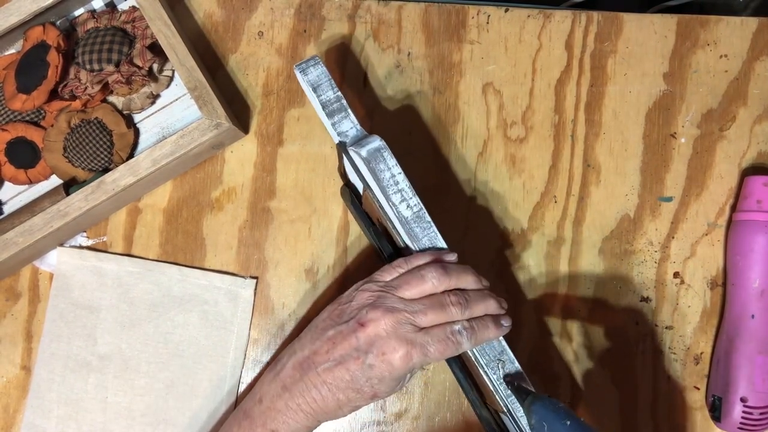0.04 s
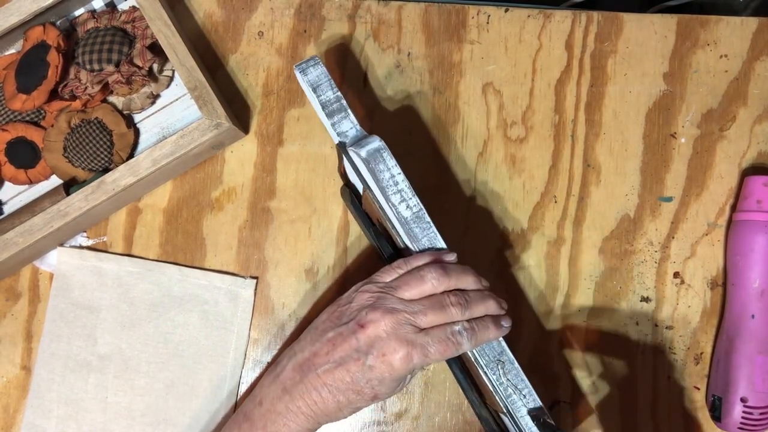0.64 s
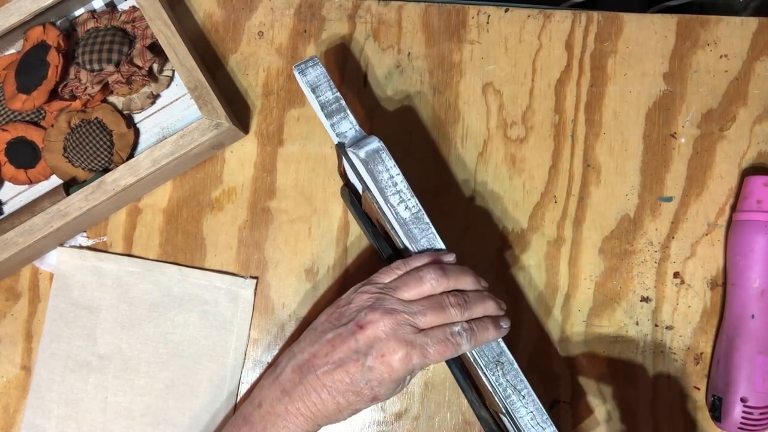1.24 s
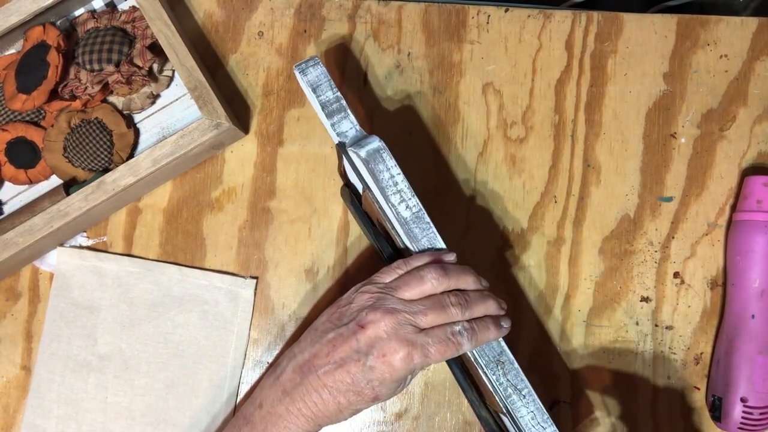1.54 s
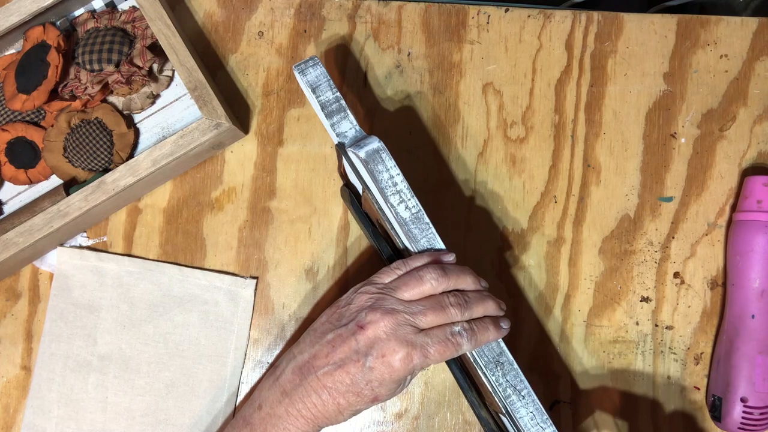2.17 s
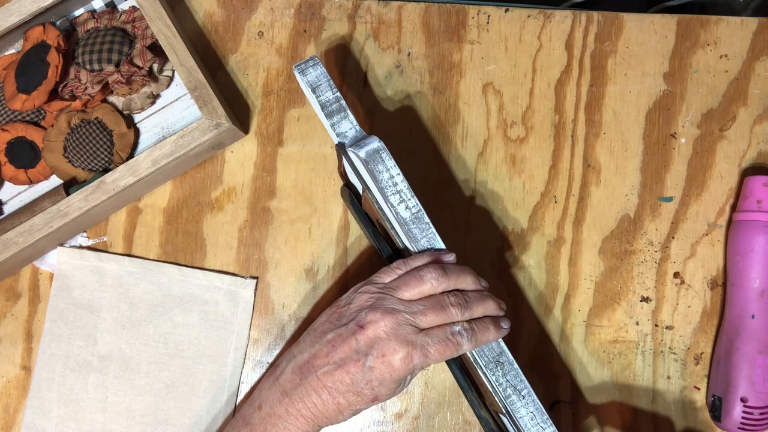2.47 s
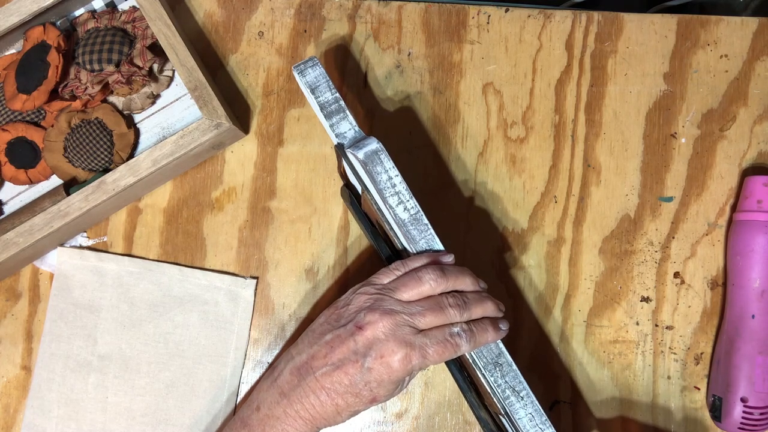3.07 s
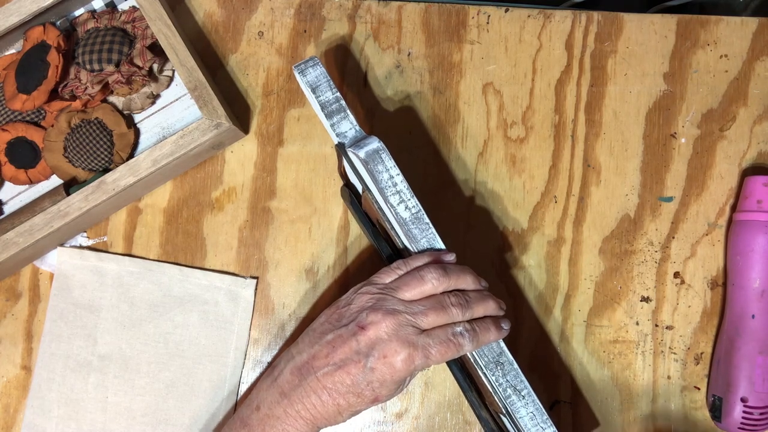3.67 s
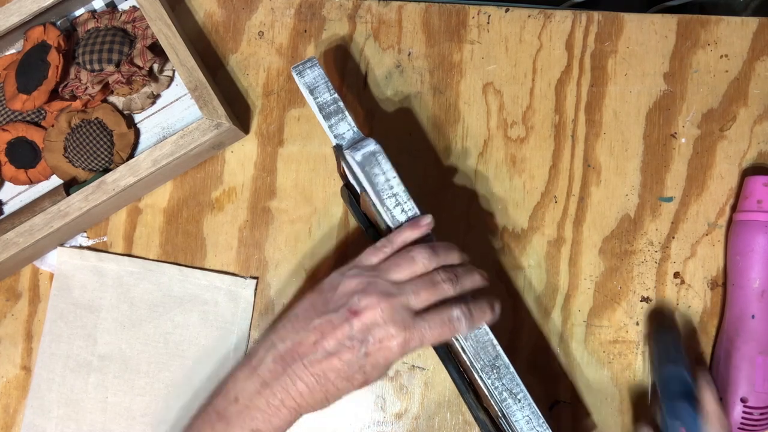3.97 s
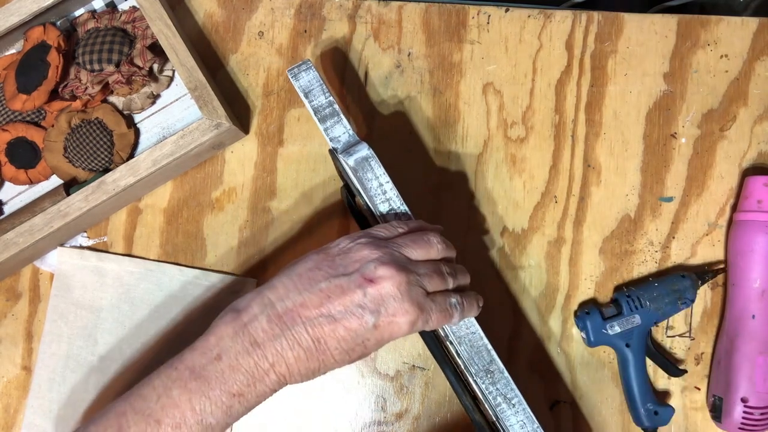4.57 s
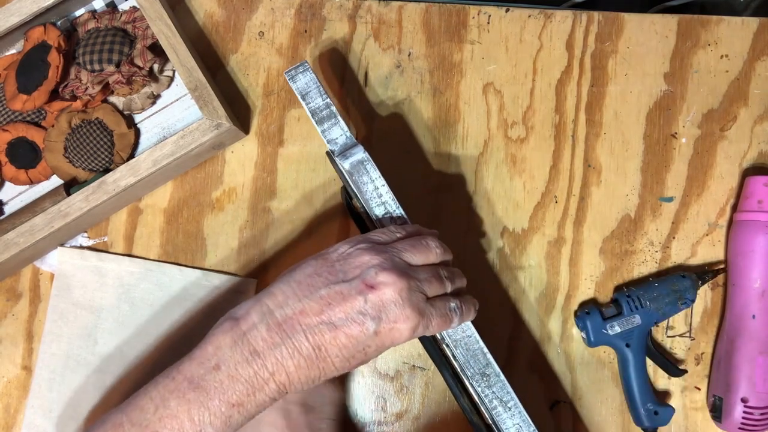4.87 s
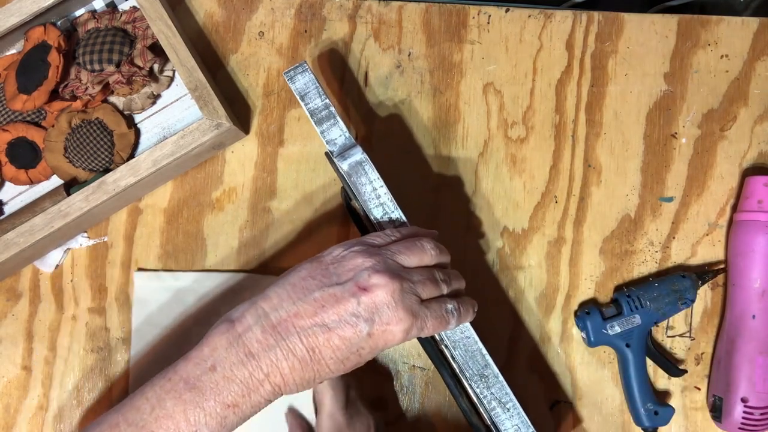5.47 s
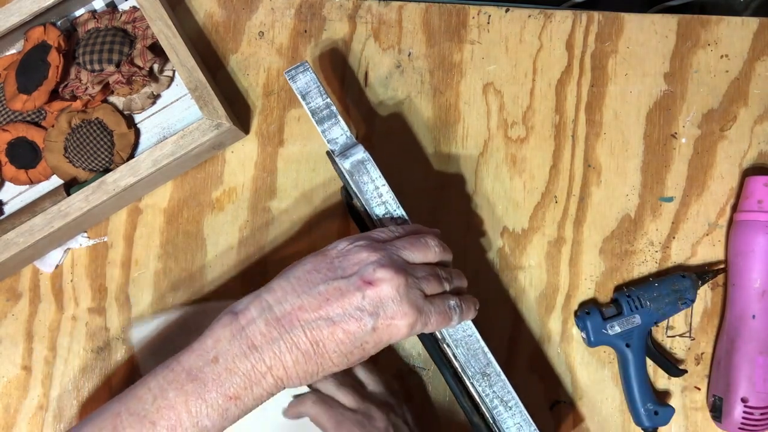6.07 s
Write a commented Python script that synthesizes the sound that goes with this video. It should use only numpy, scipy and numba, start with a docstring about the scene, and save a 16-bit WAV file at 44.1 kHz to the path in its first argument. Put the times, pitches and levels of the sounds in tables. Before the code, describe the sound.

In a small, quiet room, a hot-glue gun is squeezed four times, about once a second. Each squeeze gives a faint, dull rub and a light plastic click as the trigger snaps back. The gun is then put down on a plywood table, rattles and tips over with a sharp knock that briefly overloads the close microphone. A soft bump and a few light taps follow.

```python
"""A hot-glue gun is squeezed four times over a plywood work table: the glue stick feeds with a dull
stick-slip rub, then the plastic trigger scrapes and snaps back, ringing its housing. Put down, the gun
rattles and tips over with a sharp knock that rings shell and board and overloads the close microphone.
A hand then bumps the table and shifts the work. Behind it all is the air of a small, quiet room."""
import sys
import numpy as np
from scipy import signal
from scipy.fft import rfft, irfft, next_fast_len
from scipy.io import wavfile
from scipy.ndimage import uniform_filter1d
from numba import njit

SR = 44100
rng = np.random.default_rng(int(sys.argv[2]) if len(sys.argv) > 2 else 0)


def persist_wave(psi):
    """Save psi, clipped to +-1, as 16-bit WAV."""
    counts = np.round(np.clip(psi, -1, 1) * 32767).astype(np.int16)
    wavfile.write(sys.argv[1], SR, np.atleast_2d(counts).T)


N = 278712

# trigger let go after each squeeze: release t/s, stop t/s, release level/dB, release ring/dB,
# catch level/dB, stop level/dB, brightness/(dB/octave), slide level/dB, thud level/dB
TRIGGER_RELEASES = [(0.5378, 0.5864, -39.5, 3, -45, -37.5, -2.5, -54, -42.5),
                    (1.51, 1.5482, -33.5, 3, -30, -35, -1, -49, -41.5),
                    (2.53, 2.557, -35.5, 3, -31, -33, 1.5, -49.5, -35.5),
                    (3.4936, 3.5175, -43, 9, -52, -41.5, -5.5, -57.5, -30.5)]
def trigger(catch_lead_s=.0096, slide_growth_db=5.5):
    """The lever snaps free, slides back, catches on the ratchet and thuds against its stop."""
    out = np.zeros(N)
    for s, stop_s, snap_db, ring_db, catch_db, stop_db, tilt_db, slide_db, thud_db in TRIGGER_RELEASES:
        slide = scrape(stop_s - s + .012, slide_db, tilt_db=-1.4, ring_db=-9.5)
        swell = undb(slide_growth_db * np.linspace(-.5, .5, len(slide)))  # the spring speeds the lever up
        add(out, s, click(snap_db, tilt_db, ring_db))
        add(out, s + .005, slide * swell)
        add(out, stop_s - catch_lead_s, click(catch_db, tilt_db, ring_db=-2))
        add(out, stop_s, click(stop_db, tilt_db, ring_db=-2))
        add(out, stop_s + .005, thud(thud_db))
    return out


# tone of snapping plastic: f/Hz, level/dB
SNAP_EQ = [(300, -12), (1000, -2), (2800, 0.5), (3900, 2.5), (5200, -6.5), (7500, -5.5), (9500, -12.5),
           (15000, -21)]
# resonances of the trigger housing: f/Hz, level/dB, t60/s
HOUSING_MODES = [(1110, -7, 0.028), (1370, 2.5, 0.0075), (1650, -10, .03), (2394, -16.5, 0.07),
                 (3375, -12, 0.009), (4100, -11.5, 0.013)]
def click(db, tilt_db, ring_db):
    """Plastic snaps and the housing rings a moment later."""
    snap = undb(db - 3.5) * colour(crack(t60=.016, rise_s=.0015), SNAP_EQ, tilt_db)
    housing = np.pad(ring(HOUSING_MODES, detune=.018), (int(.0011 * SR), 0))[:len(snap)]
    return snap + undb(db + ring_db - 1) * housing


def scrape(length, db, tilt_db, ring_db, taper=.5):
    """A surface slides in tiny jerks with a hollow ring; it swells and stops."""
    count = int(length * SR)
    jerks = slips(count, per_s=9000, spread_db=2)
    housing = unit(signal.fftconvolve(jerks, ring(HOUSING_MODES, detune=.02))[:count])
    grit = colour(jerks, SNAP_EQ, tilt_db)
    return undb(db) * signal.windows.tukey(count, taper) * (grit + undb(ring_db) * housing)


# lone clicks: t/s, level/dB, brightness/(dB/octave), ring/dB
HOUSING_CLICKS = [(2.391, -59, -5, 9.5), (2.5246, -50.5, 6, 11), (3.7390, -47, 5.5, 2.5)]
def housing_clicks():
    """The housing clicks in the hand."""
    out = np.zeros(N)
    for s, db, tilt_db, ring_db in HOUSING_CLICKS:
        add(out, s, click(db, tilt_db, ring_db))
    return out


# ticks of the spring: t/s, level/dB, brightness/(dB/octave)
SPRING_TICKS = [(0.7353, -49, -5.5), (1.6228, -51, -1), (2.1810, -44.5, -3.5)]
# thin, bright tone of the spring: f/Hz, level/dB
SPRING_EQ = [(1400, -10), (3200, -15), (4300, 4), (5800, -11), (8000, -0.5), (12000, -11.5), (15000, -16)]
def spring_ticks():
    """The trigger spring ticks as it takes up load."""
    out = np.zeros(N)
    for s, db, tilt_db in SPRING_TICKS:
        add(out, s, undb(db) * colour(crack(t60=.016, rise_s=.00073), SPRING_EQ, tilt_db))
    return out


# pushes on the glue stick, and the gun dragging to rest: peak t/s, swell/s, level/dB
PUSHES = [(.41, 0.16, -55), (1.12, 0.035, -60), (1.24, 0.2, -55), (1.88, 0.18, -61), (2.39, 0.11, -56.5),
          (2.79, 0.065, -64), (3.489, 0.075, -55), (4.35, 0.079, -45.5)]
# dull tone of the rub: f/Hz, level/dB
RUB_EQ = [(60, -15), (115, -7), (185, 3.5), (290, -3.5), (480, -15.5), (1000, -23.5), (1750, -23),
          (2300, -32.5), (2900, -33.5), (3350, -21.5), (3750, -23.5), (4400, -32), (14000, -44.5)]
def glue_stick_rub(grip_db=-71, ease_share=.67):
    """Stick-slip rub follows the hand's force: each push swells and eases off over a resting grip."""
    t = np.arange(N) / SR
    power = undb(grip_db) ** 2
    for s, swell_s, db in PUSHES:
        from_peak = np.maximum((s - t) / swell_s, (t - s) / (ease_share * swell_s))
        power = power + (undb(db) / np.cosh(1.4 * from_peak)) ** 2
    return np.sqrt(power) * colour(slips(N, per_s=1100, spread_db=1), RUB_EQ)


# gun and hand hitting the table: t/s, contact corner f/Hz, board level/dB, shell level/dB, crack level/dB
KNOCKS = [(4.0369, 6500, -2.5, -11, -9.5), (4.0636, 610, -7.5, -27.5, -27),
          (4.0781, 4100, -20.5, -25.5, -22), (4.1085, 2800, -30, -30, -28), (4.1346, 1600, -23, -31, -34),
          (4.1745, 7016, -31, -25.5, -21), (4.1762, 450, -5, -27.5, -28.5),
          (4.1909, 554, -14.5, -26.5, -28.5), (4.2074, 9800, -0.5, 3, 1), (4.7940, 6500, -25, -58, -37)]
def knocks():
    """The gun lands, rocks and tips over; then the hand bumps the table."""
    out = np.zeros(N)
    for s, contact_hz, board_db, shell_db, crack_db in KNOCKS:
        add(out, s, blow(contact_hz, board_db, shell_db, crack_db))
    return out


# bursts of chatter: t/s, length/s, starting level/dB
RATTLES = [(4.073, .1, -25), (4.184, .01, -28.5), (4.224, .022, -23)]
def rattles(gap_s=.012, fall_db_per_s=100.5, scatter_db=1.5, contact_hz=2700):
    """After the gun lands and after it tips, loose parts chatter at uneven gaps and die away."""
    out = np.zeros(N)
    for s, length, db in RATTLES:
        for after in np.arange(0, length, gap_s):
            late, size = rng.standard_normal(2)
            part_db = db - fall_db_per_s * after + scatter_db * size
            hit = blow(contact_hz, board_db=part_db - .5, shell_db=part_db, crack_db=part_db - 3)
            add(out, s + after + .2 * gap_s * late, hit)
    return out


# resonances of the plywood table and the things on it: f/Hz, level/dB, t60/s
BOARD_MODES = [(167.5, -17.5, 0.16), (207.5, -16, 0.11), (341, -4, 0.055), (341, -20.5, 0.2),
               (411.5, -19.5, 0.2), (481, -13.5, .05), (603, -17, .04), (921.3, -9, .03), (1011, -14, 0.08),
               (1095, -13.5, .04), (1223, -11, 0.044), (1410, -20, .025), (3074, -24, .03),
               (4140, -17.5, 0.022)]
# resonances of the gun's shell: f/Hz, level/dB, t60/s
SHELL_MODES = [(700, -6, 0.017), (833, -13.5, .018), (1005, -10.5, .022), (1454.4, -17.5, .045),
               (1836, -9.5, 0.028), (2039, -7, .026), (2311, -16.5, 0.048), (2470, -12, 0.033),
               (2603, -5, 0.016), (2830, -8.5, .02), (3324, -11.5, 0.018), (3871, -13.5, 0.018),
               (5740, -24.5, 0.021), (7040, -25, 0.011), (7900, -21, 0.013)]
# tone of the contact transient: f/Hz, level/dB
CRACK_EQ = [(200, -5.5), (600, 2.5), (1500, 2), (2600, 0), (5000, -6.5), (9000, -11), (15000, -11)]
def blow(contact_hz, board_db, shell_db, crack_db):
    """One contact rings the table and the gun's shell and cracks where they meet."""
    board = undb(board_db) * ring(BOARD_MODES, detune=.006)
    shell = undb(shell_db) * ring(SHELL_MODES, detune=.005)
    attack = undb(crack_db) * colour(crack(t60=.012, rise_s=.0007), CRACK_EQ)
    return soften(board + shell + attack, contact_hz)


def thud(db):
    """A soft push rings only the low modes of the table."""
    return undb(db + 4.5) * soften(ring(BOARD_MODES, detune=.014), hz=220)


def low_cut(x, hz=148):
    """A low cut takes the deep bass out of the knocks and rattles."""
    return signal.sosfilt(signal.butter(5, hz, "highpass", fs=SR, output="sos"), x)


# light taps as the work is shifted: t/s, level/dB
TAPS = [(4.9374, -32), (5.106, -41), (5.1955, -37.5)]
# tone of a tap: f/Hz, level/dB
TAP_EQ = [(200, -3), (700, -6.5), (1100, 2.5), (1900, -8.5), (3500, -4), (6500, -5.5), (9000, -15.5),
          (15000, -25)]
# the hand felt through the work: t/s, level/dB
HAND_THUDS = [(1.2095, -40), (5.198, -42.5)]
def taps_and_thuds():
    """Dry, bright taps of fingertips and the work piece, and soft thuds of the hand."""
    out = np.zeros(N)
    for s, db in TAPS:
        add(out, s, undb(db - 3.5) * colour(crack(t60=.035), TAP_EQ))
    for s, db in HAND_THUDS:
        add(out, s, thud(db))
    return out


# short scrapes: t/s, length/s, level/dB, brightness/(dB/octave), ring/dB
SCRAPES = [(0.733, .04, -66, 3, -13), (1.617, .035, -64, 1, -6), (1.714, 0.032, -64.5, 4, -28),
           (2.677, 0.069, -64.5, 1.5, -3.5), (3.728, 0.36, -66, 2.5, -10), (4.04, 0.2, -41.5, -4, -8.5),
           (4.31, 0.078, -51.5, -7.5, -17)]
def handling_scrapes():
    """Fingers and gun scuff briefly as they slide."""
    out = np.zeros(N)
    for s, length, db, tilt_db, ring_db in SCRAPES:
        add(out, s, scrape(length, db, tilt_db, ring_db))
    return out


# falling chirps: t/s, length/s, first f/Hz, last f/Hz, level/dB
SQUEAKS = [(4.023, .018, 2855, 2751, -44), (4.335, 0.0355, 2767, 2380, -48)]
def squeaks(pitch_jitter=.11):
    """Plastic squeaks on the board as the gun skids and settles."""
    out = np.zeros(N)
    for s, length, first_hz, last_hz, db in SQUEAKS:
        count = int(length * SR)
        hz = np.linspace(first_hz, last_hz, count) * (1 + pitch_jitter * rng.standard_normal(count))
        chirp = np.sin(2 * np.pi * np.cumsum(hz) / SR)
        add(out, s, undb(db) * signal.windows.tukey(count, .5) * chirp)
    return out


# the hand skidding on the table: t/s, length/s, midway level/dB, brightness/(dB/octave), ring/dB
HAND_SLIDE = (4.79, .33, -58.5, -5.5, -7)
def hand_slide(slowing_db=13):
    """After the bump the hand slides on; its scrape dies away as it comes to rest."""
    out = np.zeros(N)
    s, length, db, tilt_db, ring_db = HAND_SLIDE
    slide = scrape(length, db, tilt_db, ring_db, taper=.1)
    add(out, s, slide * undb(slowing_db * np.linspace(.5, -.5, len(slide))))
    return out


# weight on the table: t/s, length/s, level/dB
FOREARM_LEANS = [(4.9, .2, -60)]
def forearm_rumble(band_hz=(45, 85)):
    """A leaning forearm draws a low rumble from the board."""
    out = np.zeros(N)
    band = signal.butter(2, band_hz, "bandpass", fs=SR, output="sos")
    for s, length, db in FOREARM_LEANS:
        count = int(length * SR)
        rumble = unit(signal.sosfilt(band, rng.standard_normal(count)))
        add(out, s, undb(db) * np.hanning(count) * rumble)
    return out


# swishes: t/s, length/s, level/dB
CLOTH_SLIDES = [(4.787, 0.29, -67), (5.4, .75, -77)]
# airy tone of cloth: f/Hz, level/dB
CLOTH_EQ = [(1000, -10), (3500, -10), (5800, -3), (6900, 2), (8200, -7), (15000, -14)]
def cloth():
    """Cloth drawn over the table gives a soft hiss."""
    out = np.zeros(N)
    for s, length, db in CLOTH_SLIDES:
        count = int(length * SR)
        hiss = colour(rng.standard_normal(count), CLOTH_EQ)
        add(out, s, undb(db) * signal.windows.tukey(count, .5) * hiss)
    return out


# thin whistles: t/s, length/s, f/Hz, level/dB
SKIN_WHISTLES = [(1.002, 0.58, 3600, -79), (2.248, 0.2, 3750, -76), (3.367, 0.15, 3670, -76),
                 (3.751, 0.22, 3340, -69.5)]
def skin_whistles(relative_width=.035):
    """Skin sliding on plastic excites one narrow resonance."""
    out = np.zeros(N)
    for s, length, hz, db in SKIN_WHISTLES:
        count = int(length * SR)
        resonance = signal.iirpeak(hz, 1 / relative_width, fs=SR)
        tone = unit(signal.lfilter(*resonance, rng.standard_normal(count)))
        add(out, s, undb(db) * signal.windows.tukey(count, .5) * tone)
    return out


# reverb bands: f/Hz, level/dB, t60/s
REVERB_BANDS = [(147.45, -9.5, 0.24), (400, -4, 0.16), (1000, -9.5, 0.2), (2500, -9, .145),
                (6000, -8.5, 0.19), (14000, -14, 0.12)]
def reverb(x, predelay_s=.005, far_db=-17, far_t60=.26):
    """Nearby things return a short diffuse tail, the walls a fainter and longer one."""
    noise = rfft(rng.standard_normal(SR // 2))
    octave = np.log2(np.maximum(np.linspace(0, SR / 2, len(noise)), 1))
    centres = np.log2(np.array(REVERB_BANDS)[:, 0])
    tail = 0
    for share, (_, db, t60) in zip(np.eye(len(REVERB_BANDS)), REVERB_BANDS):
        band = irfft(noise * np.interp(octave, centres, share), SR // 2)
        decay = np.hypot(fade(t60), undb(far_db) * fade(far_t60))
        tail = tail + undb(db) * band * decay / np.linalg.norm(decay)
    return signal.fftconvolve(x, np.pad(tail, (int(predelay_s * SR), 0)))[:N]


# bed of room air: f/Hz, level/dB
ROOM_TONE_EQ = [(22, -44), (52, -3.5), (136, -0.5), (240, -8), (274, -5.5), (322, -1.5), (410, -5),
                (457, -4), (1620, -14.5), (1900, -15.5), (2490, -17.5), (5580, -19.5), (6920, -19.5),
                (8350, -24), (15500, -27.5)]
def room_tone(db=-62.5, waver_db=2):
    """Steady hiss over a low murmur of air that wavers."""
    air = unit(colour(rng.standard_normal(N), ROOM_TONE_EQ))
    murmur = soften(air, hz=500)
    waver = undb(waver_db * drift(per_s=7.1))
    return undb(db) * (air + murmur * (waver - 1))


def undb(db):
    """Decibels to gain."""
    return 10 ** (np.asarray(db) / 20)


def unit(x):
    """Scale to rms 1."""
    return x / np.sqrt(np.mean(x ** 2))


def add(track, s, sound):
    """Mix a sound in at time s."""
    i = int(s * SR)
    track[i:i + len(sound)] += sound[:N - i]


def colour(x, points, tilt_db=0):
    """Causal EQ through (f/Hz, level/dB) points, tilted per octave; it keeps the power of white noise."""
    size = 2 * next_fast_len(len(x))
    hz = np.maximum(np.arange(size // 2 + 1) * SR / size, 1)
    f, db = np.transpose(points)
    curve_db = np.interp(np.log(hz), np.log(f), db)
    slope_db = tilt_db * np.log2(np.clip(hz, f[0], f[-1]))
    gain = unit(undb(curve_db + slope_db))
    cepstrum = irfft(np.log(gain))
    cepstrum[1:size // 2] *= 2  # minimum phase: nothing rings ahead of an attack
    cepstrum[size // 2 + 1:] = 0
    return irfft(rfft(x, size) * np.exp(rfft(cepstrum)))[:len(x)]


def fade(t60):
    """Half a second of exponential decay."""
    return np.exp(-np.log(1000) * np.arange(SR // 2) / SR / t60)


def ring(modes, detune):
    """Struck modes of alternating sign, detuned because every blow lands on a slightly different spot."""
    t = np.arange(SR // 2) / SR
    out = np.zeros(len(t))
    for k, (hz, db, t60) in enumerate(modes):
        struck_hz = hz * (1 + detune * rng.standard_normal())
        out += (-1) ** k * undb(db) * fade(t60) * np.sin(2 * np.pi * struck_hz * t)
    return out


def crack(t60, rise_s=.0005):
    """Many overlapping modes build up and die within milliseconds: a burst with an even spectrum."""
    shape = fade(t60) * (1 - np.exp(-np.arange(SR // 2) / SR / rise_s))
    spectrum = rfft(shape * rng.standard_normal(len(shape)))
    burst = irfft(spectrum / np.abs(spectrum), len(shape)) * fade(10 * t60)  # no mode outlasts the rest
    return burst * np.linalg.norm(fade(t60)) / np.linalg.norm(burst)


def soften(x, hz, q=.81):
    """Low-pass: a soft contact pushes longer and so loses the treble above its corner."""
    w = np.tan(np.pi * min(hz, SR / 3) / SR) * 2
    return signal.lfilter(*signal.bilinear([w / 2, w * w], [1, w / q, w * w]), x)


def slips(count, per_s, spread_db):
    """Stick-slip friction: dense little jerks of uneven size."""
    hit = rng.random(count) < per_s / SR
    return unit(hit * rng.standard_normal(count) * undb(spread_db * rng.standard_normal(count)) + 1e-9)


def drift(per_s):
    """Slow random drift with a spread near 1."""
    hold = int(SR / per_s)
    steps = np.repeat(rng.standard_normal(N // hold + 1), hold)
    return unit(uniform_filter1d(uniform_filter1d(steps, hold), hold)[:N])


def scene():
    """Table impacts, gun and handling in mono, with reverb over the room tone."""
    impacts = low_cut(knocks() + rattles())
    handling = trigger() + housing_clicks() + spring_ticks() + taps_and_thuds()
    handling += glue_stick_rub() + handling_scrapes() + squeaks()
    handling += cloth() + forearm_rumble() + hand_slide() + skin_whistles()
    send = undb(-.5) * impacts + handling
    return (impacts + handling + reverb(send) + room_tone())[None]


@njit
def follow(x, attack, release):
    """Level follower: quick to rise, slow to fall."""
    out, level = np.empty(len(x)), 0.
    for i in range(len(x)):
        level += (abs(x[i]) - level) * (attack if abs(x[i]) > level else release)
        out[i] = level
    return out


def record(dry, attack_s=.012, release_s=.42, threshold_db=-17, squeeze=.77, lag_s=.0045, top_hz=15800):
    """Gain control ducks after the loud knocks, too late to stop the overload; the top end is cut."""
    level = follow(dry[0], 1 / (attack_s * SR), 1 / (release_s * SR))
    gain = np.maximum(level / undb(threshold_db), 1) ** -squeeze
    late_gain = np.pad(gain, (int(lag_s * SR), 0), constant_values=1)[:N]
    overloaded = np.clip(dry * late_gain, -1, 1)
    return signal.sosfilt(signal.ellip(10, .2, 90, top_hz, fs=SR, output="sos"), overloaded)


dry = scene()
out = record(dry)
persist_wave(out)
```